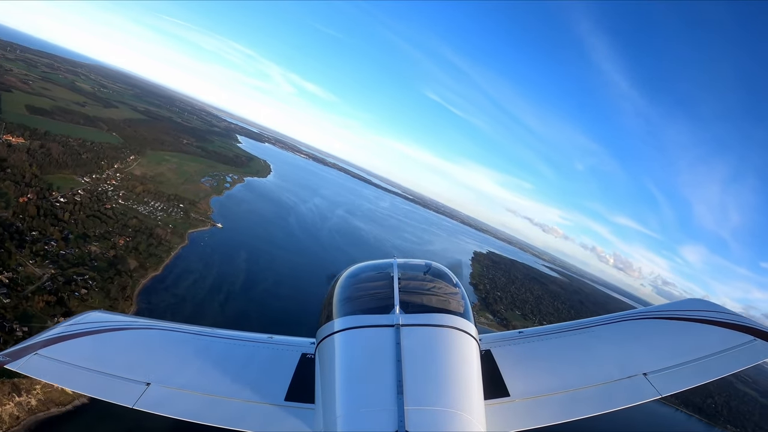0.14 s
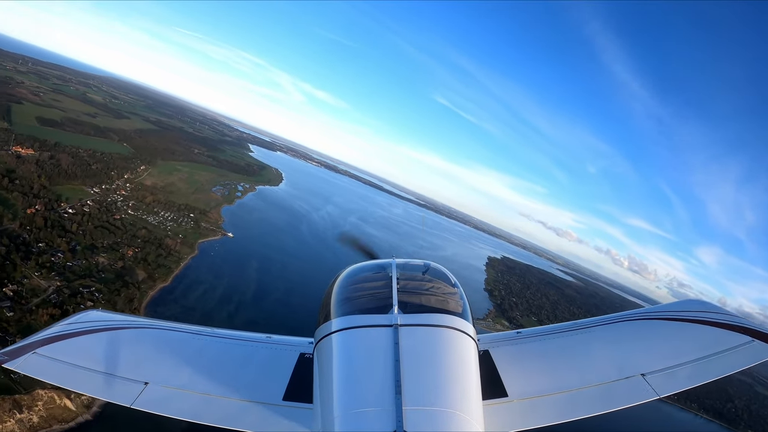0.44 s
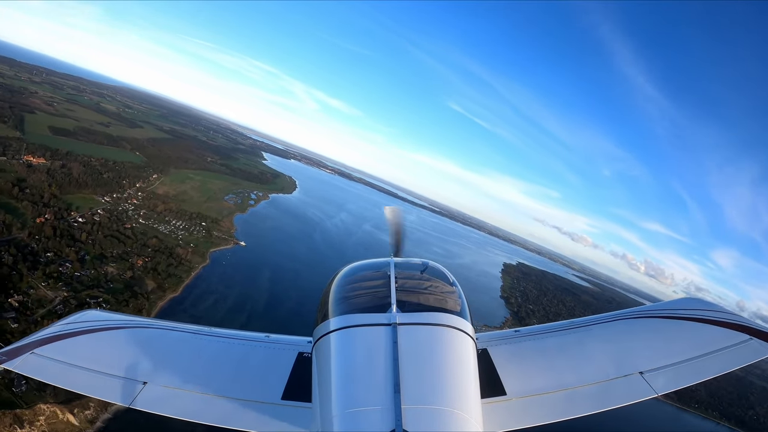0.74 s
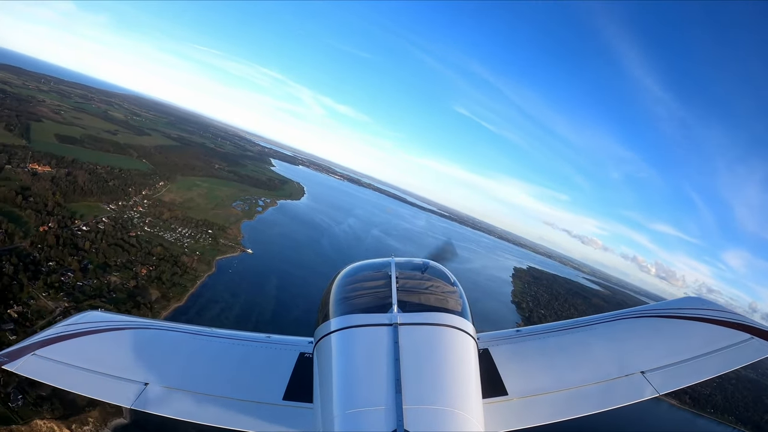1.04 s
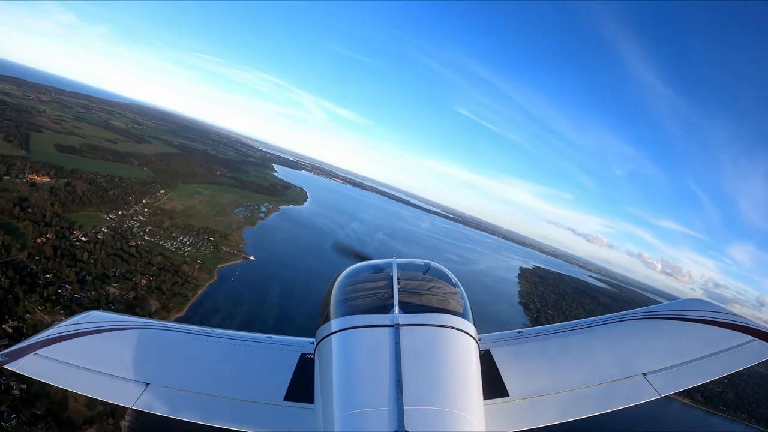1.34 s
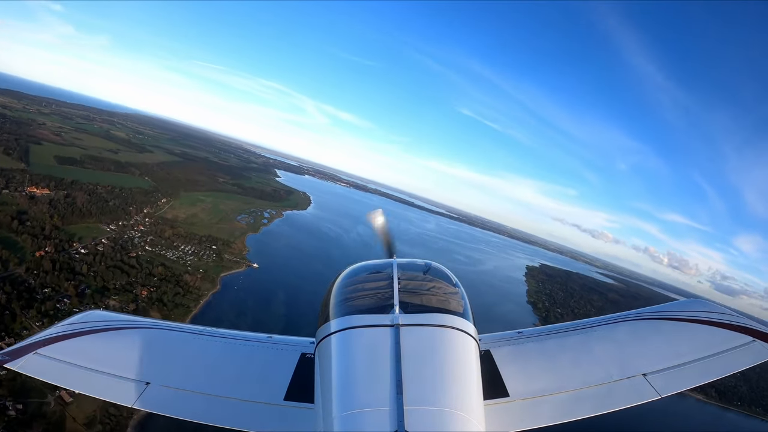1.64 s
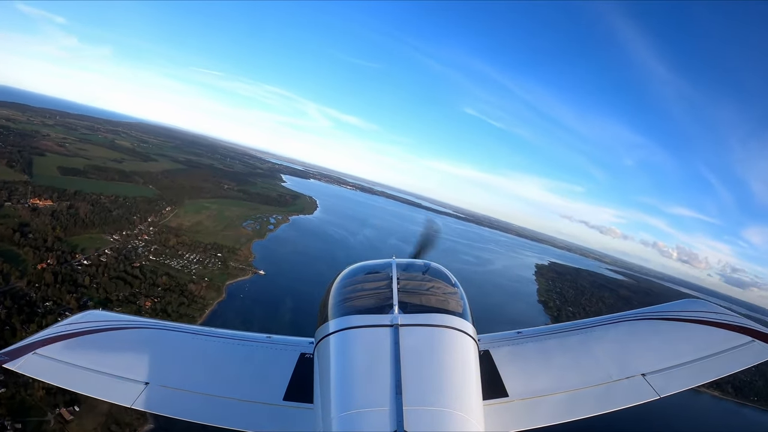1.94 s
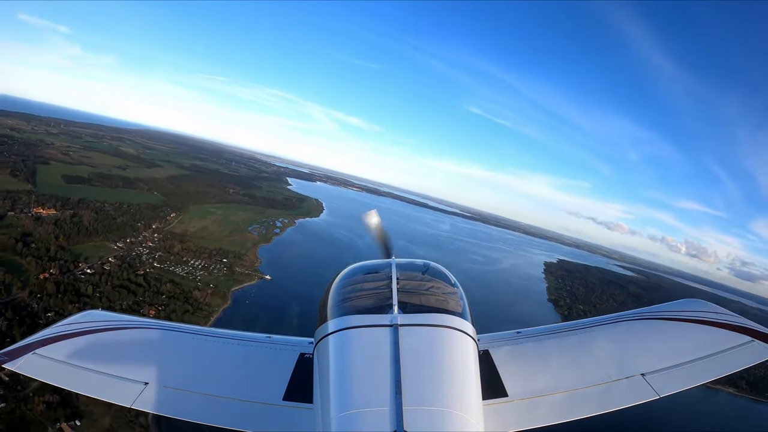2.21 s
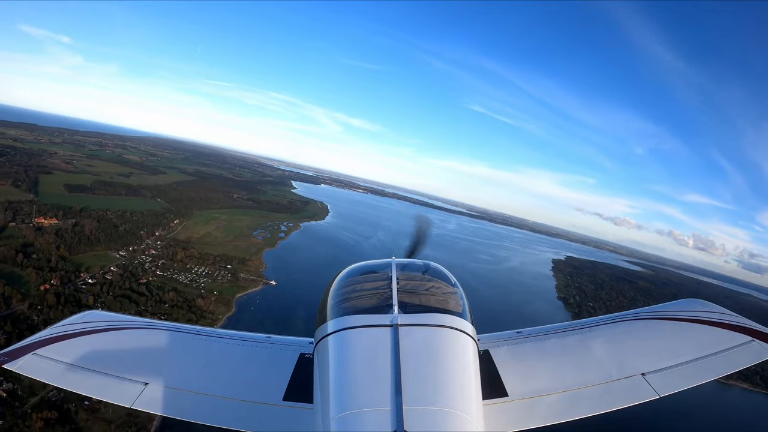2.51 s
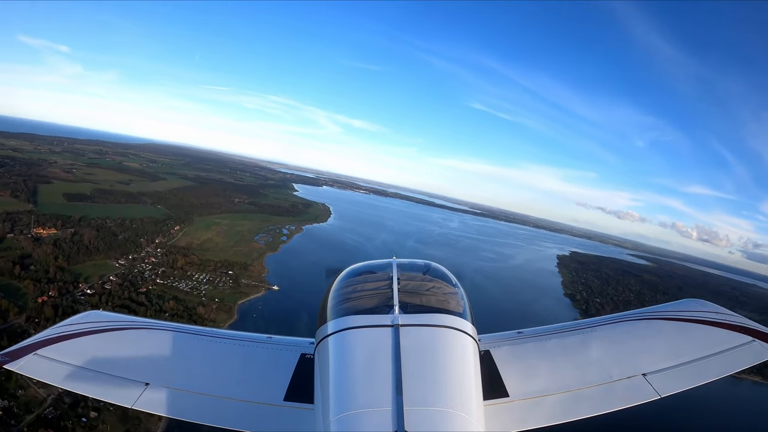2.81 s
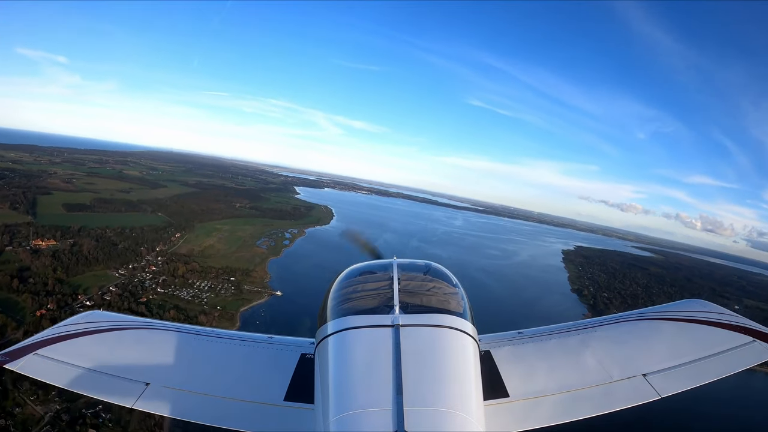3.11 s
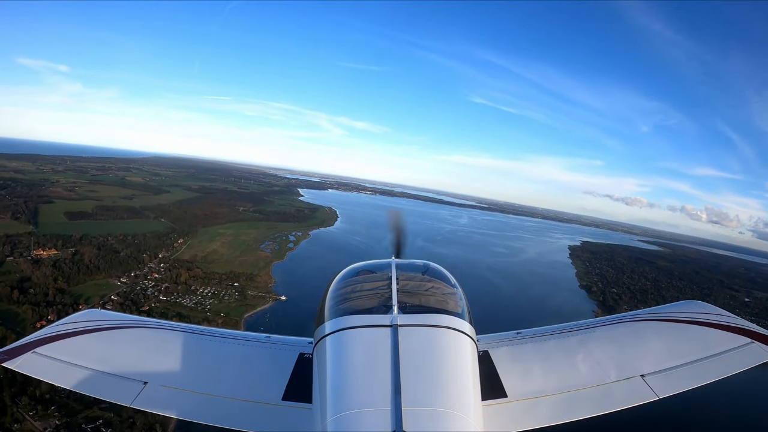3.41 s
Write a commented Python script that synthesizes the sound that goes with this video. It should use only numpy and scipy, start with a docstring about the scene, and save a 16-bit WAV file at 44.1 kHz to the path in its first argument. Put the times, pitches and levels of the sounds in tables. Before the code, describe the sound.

Continuous deep propeller and engine hum of a light plane in flight, blended with low, slightly fluttering wind roar and faint hiss. The microphone rides outside on the fuselage; nothing starts, stops or passes.

```python
"""A steady propeller and engine hum under rushing air: a small piston aircraft in cruise, heard on top of the fuselage.
Two-blade propeller and four-cylinder engine: wavering sines on multiples of the shaft speed.
Slipstream over the skin: shaped noise, with peaks and dips in its spectrum.
Two microphone ports share the roar; a second noise hisses in opposite sign at each. Two rings swell on their own."""
import sys
import numpy as np
from scipy import signal
from scipy.fft import rfft, irfft
from scipy.io import wavfile

SR = 44100
rng = np.random.default_rng(int(sys.argv[2]) if len(sys.argv) > 2 else 0)


def unload_audio(sound):
    """Save the sound as a 16-bit wav file, at the path given as the first command line argument."""
    columns = np.transpose(np.atleast_2d(sound))
    # keep every value between -1 and 1, then stretch to whole-number steps
    steps = np.round(np.clip(columns, -1, 1) * 32767)
    wavfile.write(sys.argv[1], SR, steps.astype(np.int16))


N = 156555
TIME_S = np.arange(N) / SR
BIN_HZ = np.maximum(np.arange(N // 2 + 1) * SR / N, 1)  # floor keeps the logs finite


def amp(db):
    """dB to gain."""
    return 10 ** (np.asarray(db) / 20)


def rms_one(x):
    """Scale to unit rms."""
    return x / np.sqrt(np.mean(x ** 2))


def at_bins(points):
    """Interpolate a spectrum table in dB over log frequency."""
    point_hz, point_db = np.transpose(points)
    return np.interp(np.log(BIN_HZ), np.log(point_hz), point_db)


def drift(rate_hz):
    """Slow random wander, rms 1: white noise through a double real pole, run at SR / 40."""
    pole = np.exp(-2 * np.pi * rate_hz * 40 / SR)
    white = rng.standard_normal(N // 40 + 2002)
    slow = signal.lfilter([1], [1, -2 * pole, pole ** 2], white)[2000:]  # drop the filter's start
    return np.interp(np.arange(N) / 40, np.arange(len(slow)), rms_one(slow))


def noise_spectrum(gain):
    """Spectrum of white noise shaped by a gain per bin; rms 1 in time."""
    spectrum = rfft(rng.standard_normal(N)) * gain
    return spectrum / np.sqrt(np.mean(irfft(spectrum, N) ** 2))


def bell(mid_hz, width_hz):
    """Bell-shaped curve over frequency, peak 1, half height at the width."""
    return 1 / (1 + (2 * (BIN_HZ - mid_hz) / width_hz) ** 2)


# sounding multiples of shaft speed: order
SHAFT_ORDERS = [1, 1.5, 2, 2.5, 3, 4, 4.5, 6, 6.5, 10, 14, 19.5, 20, 20.5, 21, 30.5]
# their mean levels: rms_db
SHAFT_ORDER_DB = [-56, -55.5, -29.4, -59, -55, -46.5, -56, -41.3, -56, -55, -61, -63, -67, -65, -65, -71]
# port imbalance by order: left_minus_right_db
SHAFT_ORDER_LEAN_DB = {4: 2.2, 4.5: 1.5}
SHAFT_HZ, SHAFT_WANDER_RAD, PULSE_PHASE_RAD = 38.77, .06, 2.4
BLADE_WAVER_DB, OTHER_WAVER_DB, WAVER_HZ = .25, 1.5, 3  # blade-rate multiples are the even orders


def engine():
    """Propeller and firing pulses: sines locked to one shaft angle, each level wavering."""
    shaft_rad = 2 * np.pi * SHAFT_HZ * TIME_S + SHAFT_WANDER_RAD * drift(.4)
    out = np.zeros((2, N))
    for order, rms_db in zip(SHAFT_ORDERS, SHAFT_ORDER_DB):
        spread_db = OTHER_WAVER_DB if order % 2 else BLADE_WAVER_DB
        waver_db = spread_db * drift(WAVER_HZ)
        lean_db = SHAFT_ORDER_LEAN_DB.get(order, 0) * np.array([[.5], [-.5]])
        sine = np.sqrt(2) * np.cos(order * shaft_rad + PULSE_PHASE_RAD)  # rms 1
        out += amp(rms_db + waver_db + lean_db) * sine
    return out


# roar common to both ports: freq_hz, relative_density_db
ROAR_SPECTRUM = [(4, -16), (15, -31), (30, -10.5), (60, -9.5), (95, -3), (125, -2), (145, -10), (220, -4.5),
                 (250, -8), (290, -12.5), (480, -16), (800, -19), (1130, -26), (1500, -26), (2200, -26),
                 (3000, -28), (4500, -29), (6000, -35.5), (7100, -41), (9000, -41.5), (11500, -44.5),
                 (12300, -44.5), (15000, -42.5), (16000, -53)]
# hiss opposite at the ports: freq_hz, relative_density_db
OPPOSITE_SPECTRUM = [(12, -47), (20, -15), (49, -28), (100, -3), (157, -4), (245, -6), (323, -8), (596, -5),
                     (745, -13), (957, -6), (1260, -29), (1720, -11), (2400, -18.5), (3640, -6.5),
                     (7100, -12), (13500, -9), (15500, -10.5)]
# peaks and dips in the roar's spectrum: mid_hz, width_hz, lift_db
ROAR_PEAKS_AND_DIPS = [(15, 14, 10), (30, 8, -5), (78, 16, -4), (97, 14, 2), (218, 30, -3.5), (268, 25, -2),
                       (355, 60, 7.5), (460, 80, -1.5), (2430, 60, -2), (3200, 500, -1.5), (3750, 200, 1.5),
                       (4300, 150, -2.5), (4800, 200, -3), (5300, 150, -2), (325, 25, 2), (598, 50, 7),
                       (570, 15, -5), (715, 25, -5), (785, 50, -3), (955, 40, 5), (1015, 45, 5),
                       (1140, 60, -4), (1480, 40, -5), (1940, 40, -5), (2200, 50, -4), (7300, 300, -2),
                       (1650, 200, 5), (1830, 80, 4), (2350, 40, 5), (3470, 70, 4), (7810, 300, 3),
                       (9680, 1200, 3), (13050, 700, 5), (13700, 1300, 4)]
# port imbalance: freq_hz, left_minus_right_db
PORT_LEAN = [(100, 0), (160, .5), (270, 0), (500, .5), (800, .5), (1200, 0), (2010, 0), (3330, -1),
             (4500, -2), (6400, 0), (9080, 2.5), (15000, 4.5)]
ROAR_DB, OPPOSITE_DB = -37.5, -51  # rms before lean and swells
PATCH_DB, PATCH_HZ = .5, 9.6


def skin_turbulence():
    """Turbulent noise with spectral peaks and dips; octave bands swell separately, more so in the treble."""
    lift_db = sum(lift * bell(mid_hz, width_hz) for mid_hz, width_hz, lift in ROAR_PEAKS_AND_DIPS)
    common = amp(ROAR_DB) * noise_spectrum(amp(at_bins(ROAR_SPECTRUM) + lift_db))
    opposite = amp(OPPOSITE_DB) * noise_spectrum(amp(at_bins(OPPOSITE_SPECTRUM)))
    lean = amp(at_bins(PORT_LEAN) / 2)
    ports = np.array([(common + opposite) * lean, (common - opposite) / lean])
    out = np.zeros((2, N))
    for octave in range(13):
        offset_oct = np.log2(BIN_HZ / 4) - octave
        band = np.cos(np.pi / 2 * np.clip(offset_oct, -1, 1)) ** 2  # neighbours sum to 1
        swell_db = PATCH_DB * min(octave / 8, 1) * drift(PATCH_HZ)
        out += amp(swell_db) * irfft(ports * band, N)
    return out


# swelling narrow bands: mid_hz, width_hz, rms_db (before swell and airflow)
SWELLING_RINGS = [(1314, 210, -56), (2010, 93, -61.5)]


def swelling_rings(swells_db):
    """Narrow noise bands, equal at both ports, each following its own level curve."""
    out = np.zeros(N)
    for (mid_hz, width_hz, rms_db), swell_db in zip(SWELLING_RINGS, swells_db):
        out += amp(rms_db + swell_db) * irfft(noise_spectrum(bell(mid_hz, width_hz)), N)
    return out


# airflow course: time_s, level_db, lower_ring_swell_db, upper_ring_swell_db
AIRFLOW_COURSE = [(0, 0, -5, 0), (.3, 0.4, 1, 7.5), (.55, -1, 0, 2), (.9, 0.5, -11, 4), (1.2, 0.4, 2.5, 5),
                  (1.6, 0.44, -0.5, -2), (1.9, 0.4, 3, 2), (2.3, 0.3, 3, 3.5), (2.7, -1, 3.5, 1),
                  (2.9, 0.1, 4, 4), (3.05, 0, 1.5, 5), (3.55, 0.7, 0.5, 2)]
GUST_DB, GUST_HZ = .35, 3.6
FLUTTER_DB, FLUTTER_HZ = .5, 38.0


def slipstream():
    """Skin turbulence and rings share one airflow level, with random gusts and faster flutter."""
    point_s, *columns = np.transpose(AIRFLOW_COURSE)
    flow_db, *swells_db = [np.interp(TIME_S, point_s, column) for column in columns]
    gust_db = GUST_DB * drift(GUST_HZ) + FLUTTER_DB * drift(FLUTTER_HZ)
    return amp(flow_db + gust_db) * (skin_turbulence() + swelling_rings(swells_db))


def scene():
    """Engine and slipstream sound together throughout."""
    return engine() + slipstream()


CUTOFF_HZ = 15680


def record(dry):
    """Steep elliptic low-pass: 0.3 dB ripple, 100 dB stopband."""
    low_pass = signal.ellip(14, .3, 100, CUTOFF_HZ, fs=SR, output="sos")
    return signal.sosfilt(low_pass, dry)


dry = scene()
out = record(dry)
unload_audio(out)
```